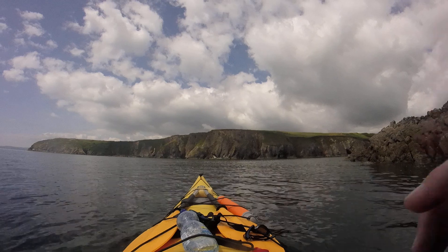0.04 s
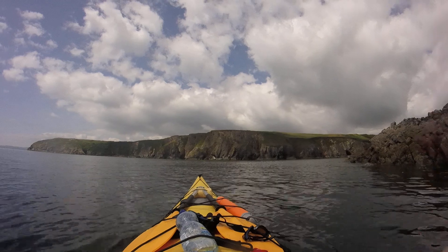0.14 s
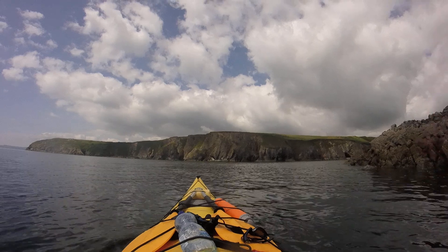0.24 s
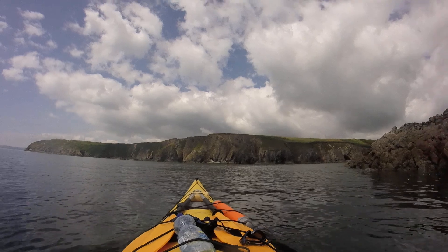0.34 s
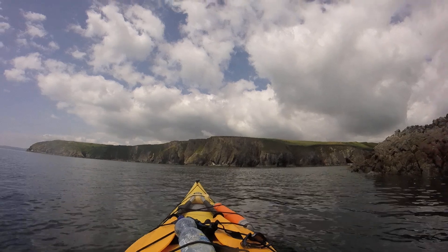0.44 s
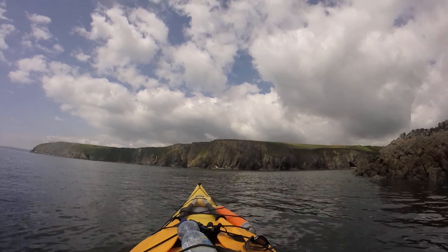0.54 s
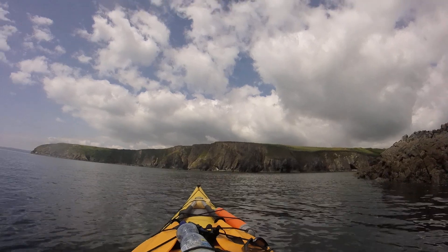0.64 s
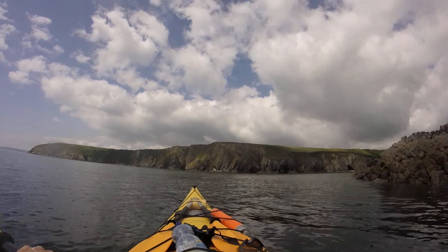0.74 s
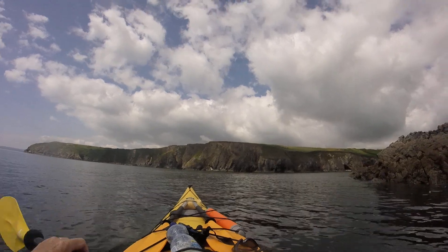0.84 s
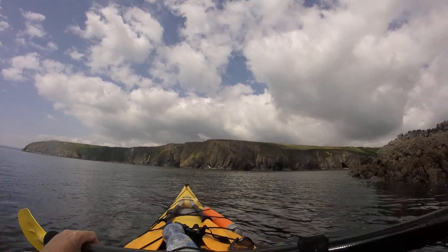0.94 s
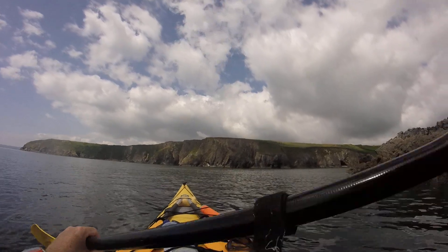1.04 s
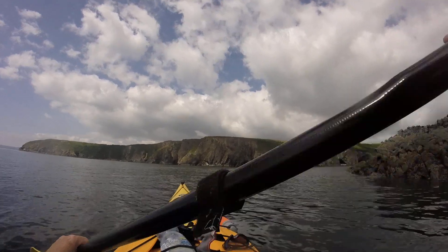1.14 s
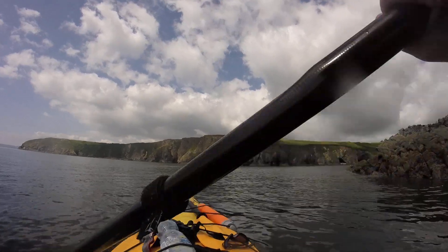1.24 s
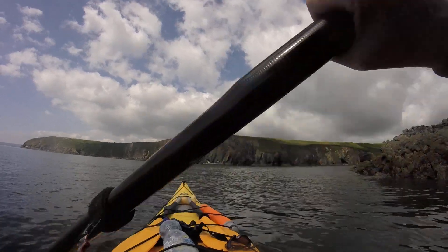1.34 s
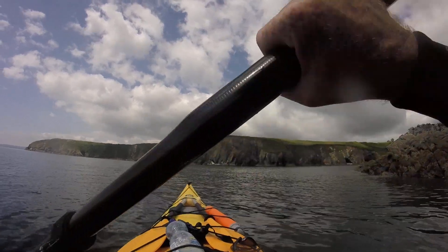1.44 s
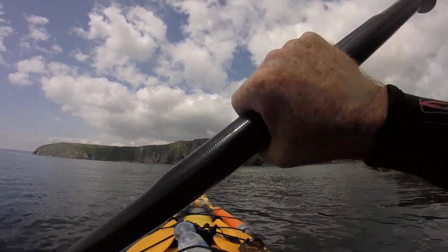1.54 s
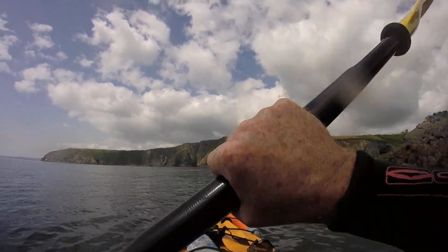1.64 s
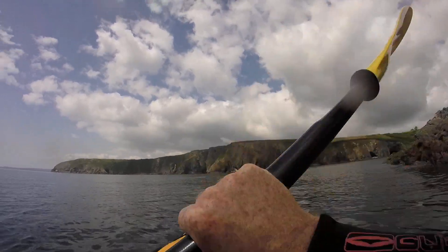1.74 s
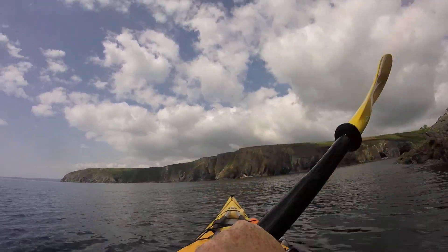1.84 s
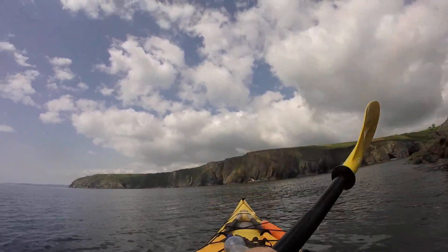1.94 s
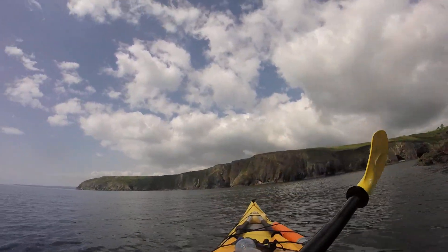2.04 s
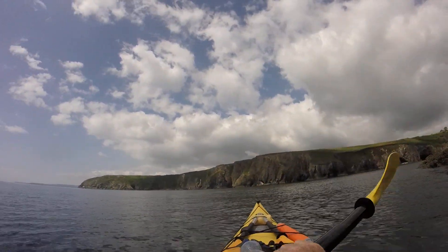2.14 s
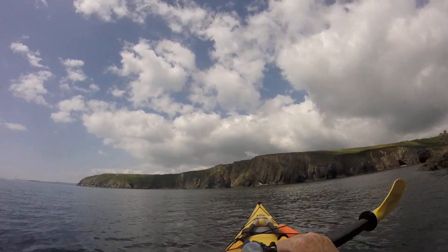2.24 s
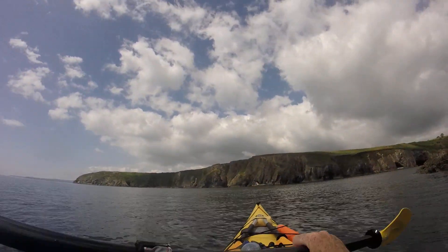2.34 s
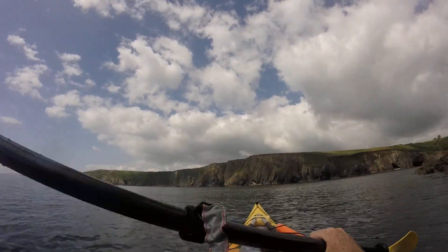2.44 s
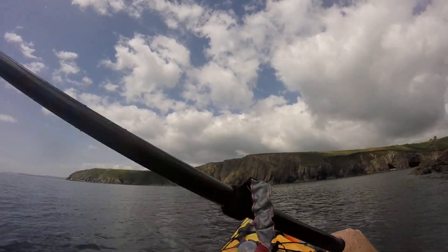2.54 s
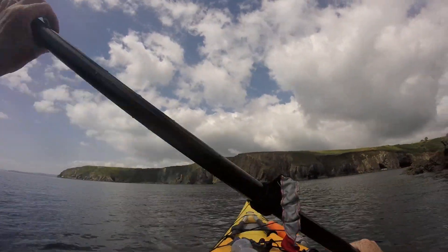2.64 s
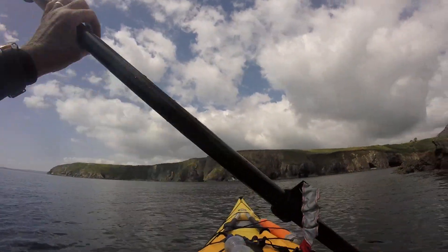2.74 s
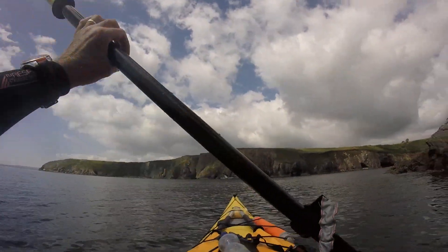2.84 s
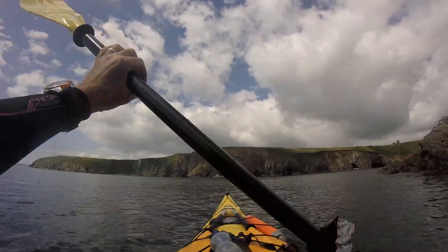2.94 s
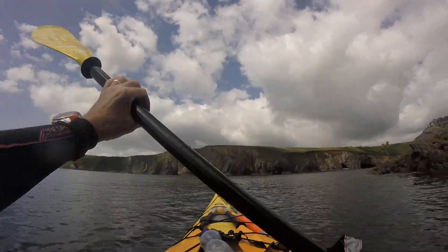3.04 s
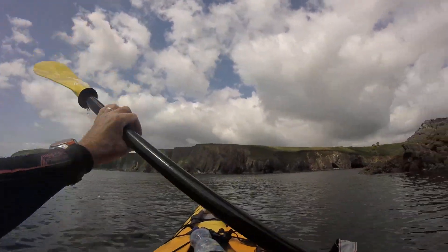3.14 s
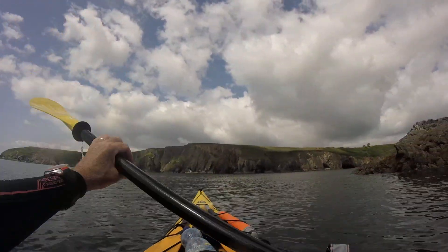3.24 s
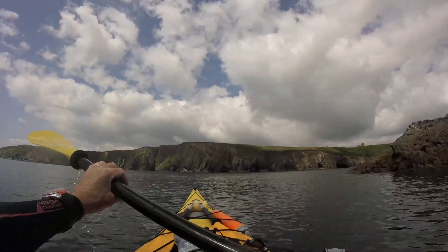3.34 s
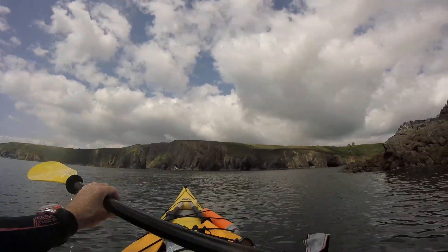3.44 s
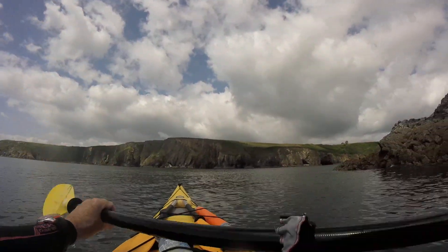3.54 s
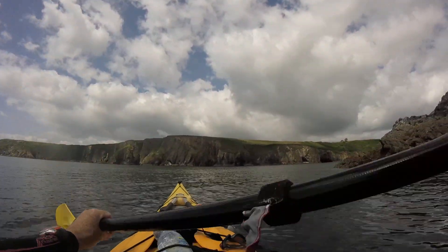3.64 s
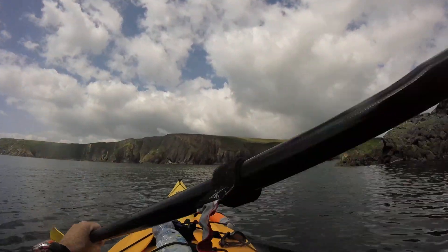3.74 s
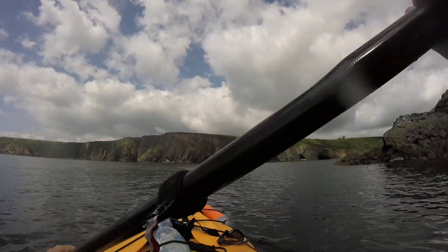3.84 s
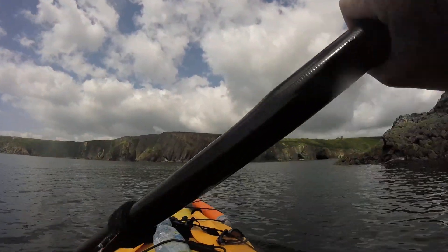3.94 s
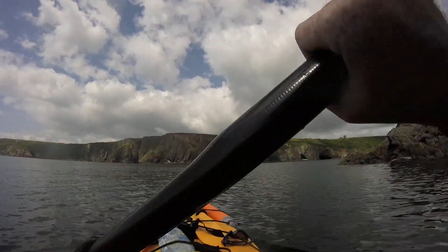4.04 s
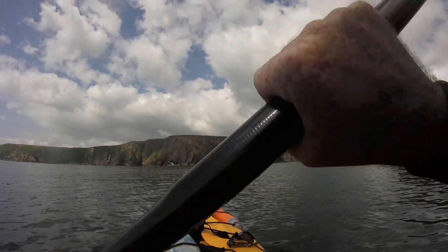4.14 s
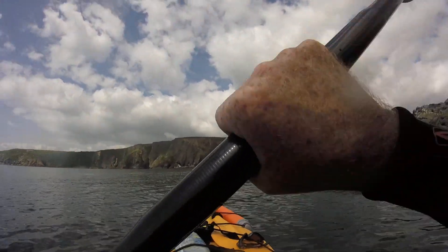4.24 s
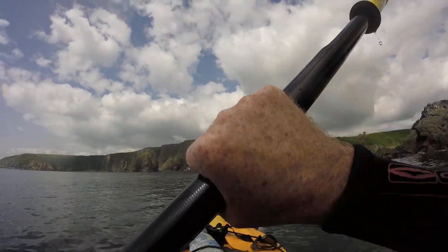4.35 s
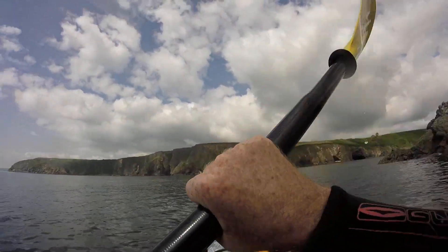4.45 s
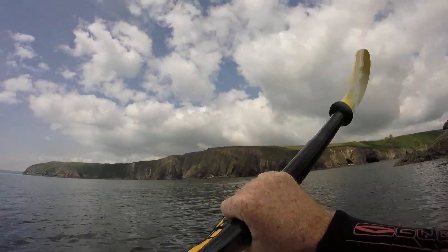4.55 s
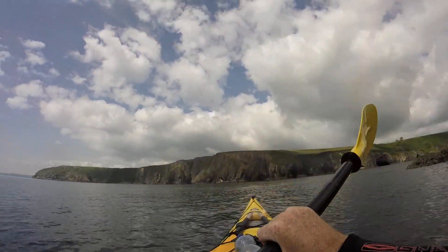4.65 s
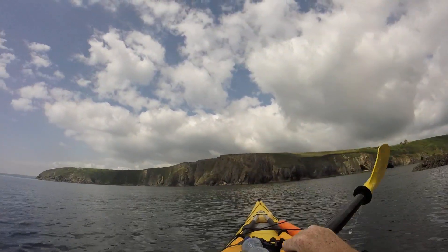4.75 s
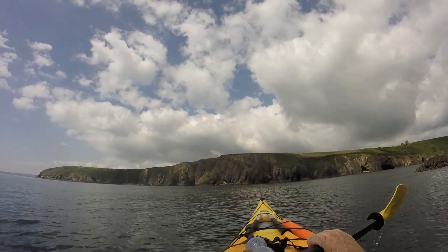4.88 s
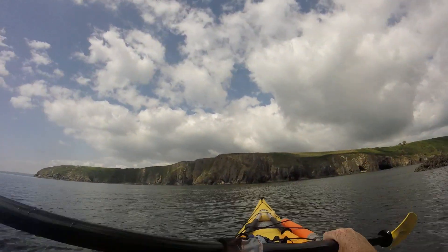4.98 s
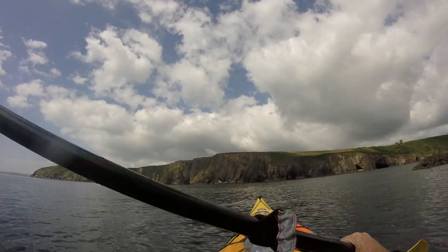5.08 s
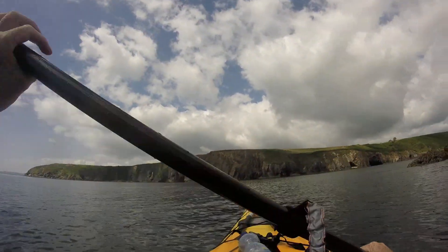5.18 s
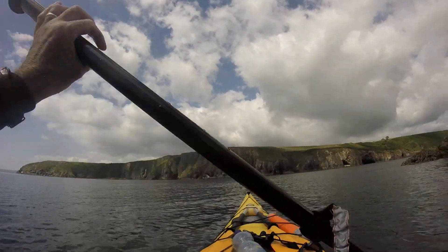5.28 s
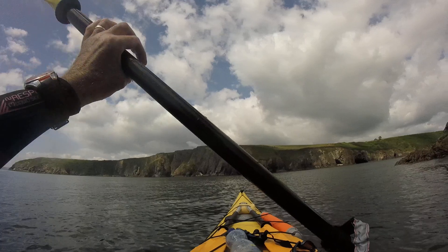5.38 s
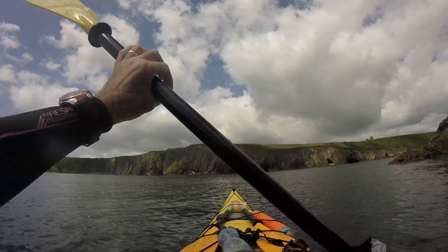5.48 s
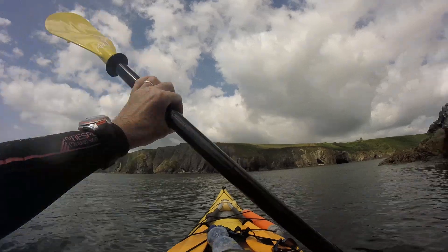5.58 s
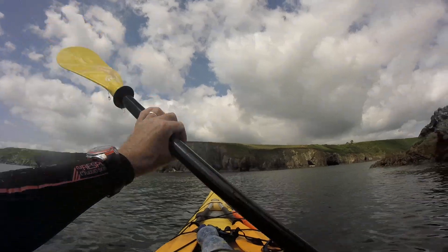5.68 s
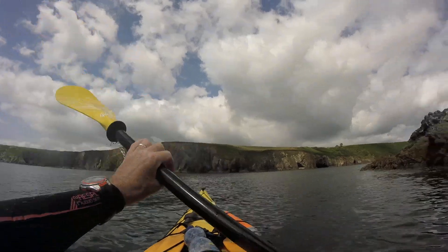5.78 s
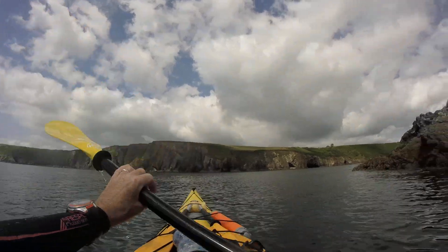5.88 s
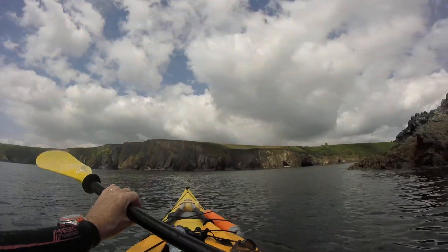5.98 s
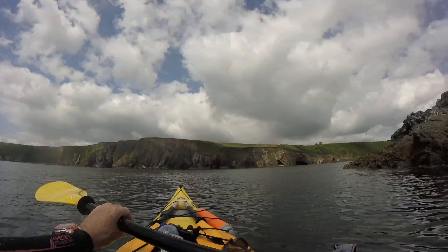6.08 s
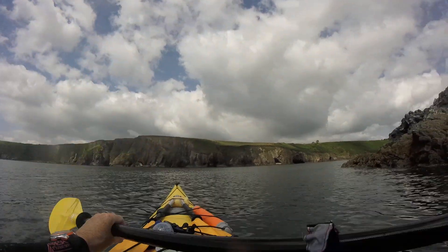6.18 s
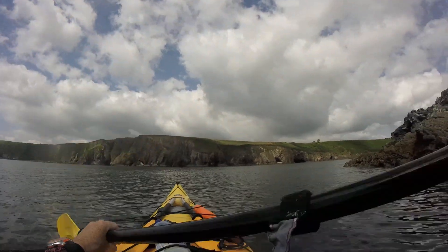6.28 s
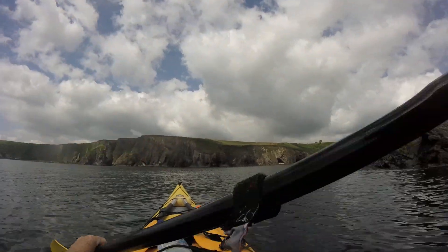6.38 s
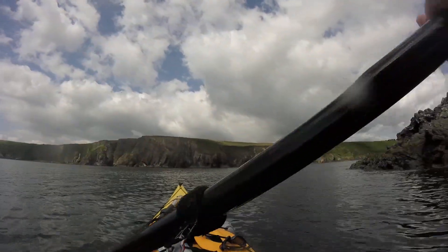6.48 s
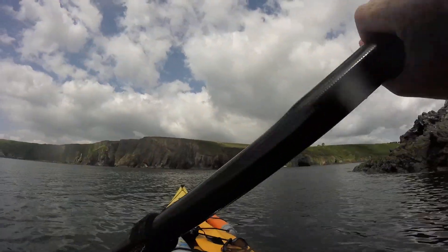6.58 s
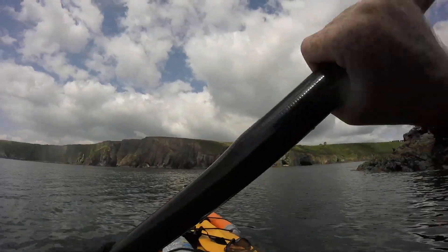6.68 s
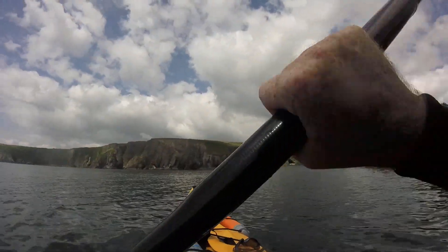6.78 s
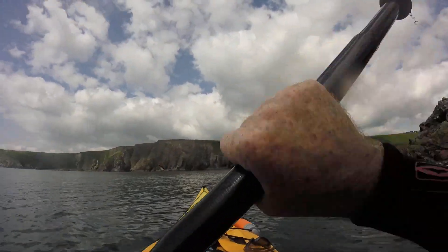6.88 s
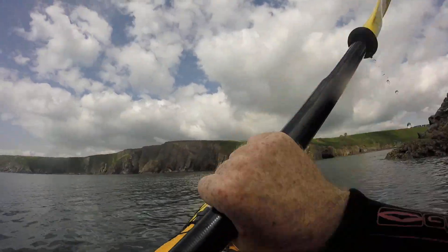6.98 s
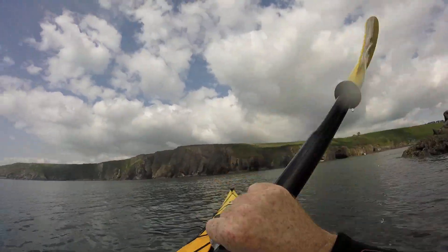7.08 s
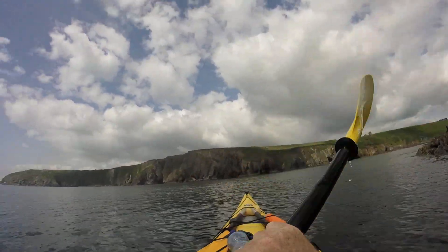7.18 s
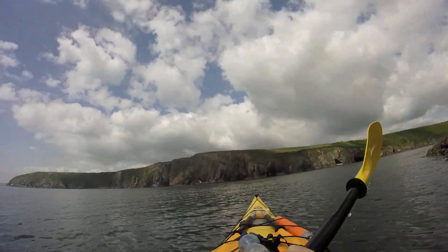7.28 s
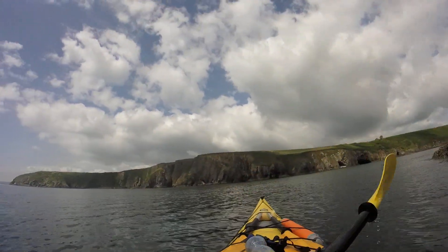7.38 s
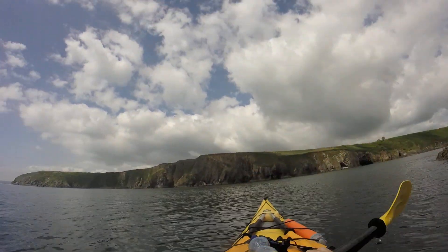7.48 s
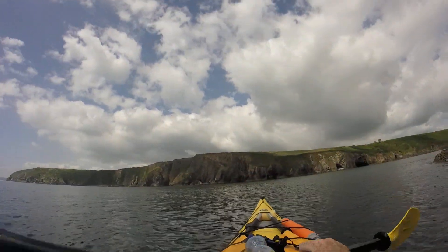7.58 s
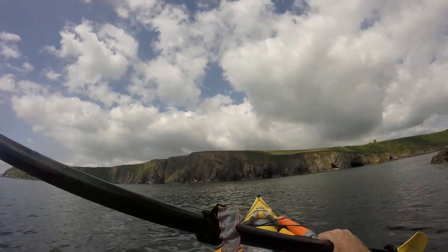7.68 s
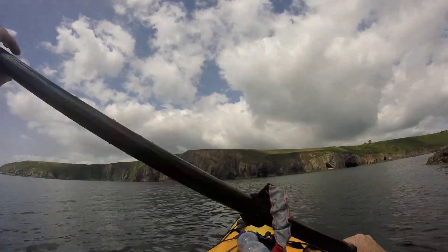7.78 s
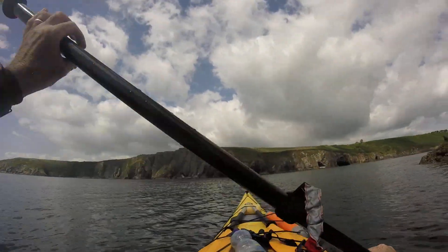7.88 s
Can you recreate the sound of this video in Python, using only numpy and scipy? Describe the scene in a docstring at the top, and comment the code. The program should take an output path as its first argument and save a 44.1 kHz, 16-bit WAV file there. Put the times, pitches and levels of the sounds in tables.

```python
"""Sea kayak paddle, five alternating strokes, heard from a camera in a waterproof case.
Each pull tears the surface into small bubbles (splash) and drags air pockets under (gurgle).
Drops off the raised blade tap the case and deck or plink in the sea; fine spray ticks.
Light wind rumbles and ripples wash around the hull. The hollow case adds its resonances."""
import sys
import numpy as np
from scipy import signal
from scipy.fft import rfft, irfft, next_fast_len
from scipy.io import wavfile
from scipy.ndimage import map_coordinates

SR = 44100
rng = np.random.default_rng(int(sys.argv[2]) if len(sys.argv) > 2 else 0)


def materialize(psi):
    """Save the field psi as 16-bit PCM at rate SR to the path in sys.argv[1].

    A 1-D psi becomes a single channel; in a 2-D psi each row is a channel.
    """
    bounded = np.clip(np.atleast_2d(psi).T, -1, 1)
    quanta = np.round(bounded * 32767).astype(np.int16)
    wavfile.write(sys.argv[1], SR, quanta)


N = 349272
T = np.arange(N) / SR

# case resonances: f/Hz, width/Hz, lift/dB
CASE_MODES = [(846, 56, 7), (1183, 283, 12), (1402, 167, 11), (2010, 66, 4), (2265, 64, 5.5),
              (2724, 233, 12), (3084, 200, 4.5), (3833, 130, 8), (4350, 120, 0.5), (5340, 300, 11.5),
              (7150, 240, 6.5), (9000, 340, 5.5)]
# breeze with lulls: t/s, level/dB
BREEZE_LEVELS = [(0.05, -67.5), (0.6, -57.5), (0.8, -49), (1.5, -47.5), (2.5, -49), (2.85, -45.5),
                 (3.7, -47), (4.85, -51), (5.1, -56), (5.4, -45.5), (6.55, -49.5), (7.92, -48)]
# soft thumps of air on the case: t/s, level/dB
AIR_THUMPS = [(1.43, -42.5), (4.01, -39.5), (4.95, -46), (6.39, -42.5)]
# spray near the microphone: t/s, relative level/dB
SPRAY_TICKS = [(1.244, -55), (1.2633, -48), (3.954, -49.5), (4.257, -49), (4.273, -52), (5.1126, -50),
               (5.2138, -47), (6.045, -48), (6.515, -49), (6.524, -40.5), (6.905, -45.5), (7.829, -47)]
# bubbles trapped by drips: t/s, level/dB, f/Hz
DRIP_BUBBLES = [(1.259, -32, 1470), (1.576, -49, 3130), (1.6578, -37.5, 1680), (3.628, -36.5, 1500),
                (4.168, -44, 1500), (5.217, -38, 1303), (5.236, -41, 2700), (7.8796, -40.5, 2690)]
# drops on case and deck: t/s, level over 5 ms/dB, ring f/Hz, ring lift/dB, splatter/s, treble/dB
DROP_HITS = [(0.8048, -34.5, 1370, 0.5, 0.0021, -15), (0.8234, -31, 2410, 10, 0.017, -12),
             (0.828, -33, 2430, 11, .011, -5), (0.893, -48, 2760, 14, .006, -17),
             (1.256, -34, 1600, 20, .0022, -5), (1.7611, -24.5, 2370, 7, 0.00063, -20.5),
             (2.116, -31, 2240, 5, 0.013, -18), (2.679, -40, 1400, -3, .012, -9),
             (3.161, -21.5, 1900, 8.5, 0.0023, -1.5), (3.261, -33, 2830, 7, 0.016, -9),
             (4.2685, -37.5, 1640, 10, 0.015, -18), (4.607, -28, 1390, 5, 0.011, -13),
             (4.6434, -39, 1370, -1, 0.0071, -10), (5.146, -49.5, 1580, 11, 0.0045, -16),
             (5.644, -31.5, 2700, 9, 0.011, -7), (6.512, -42.5, 1420, 11, 0.033, -4),
             (6.89, -39.5, 2130, 12, .014, -9), (7.1806, -25.5, 1350, 7, 0.0088, -19),
             (7.8285, -36.5, 2850, 22, 0.0053, -6)]
# water folding by the blade or slapping the hull: t/s, half length/s, splash/dB, gurgle/dB
WATER_SURGES = [(0.75, .04, -58.5, -59), (1.117, 0.086, -53.5, -54), (1.444, 0.061, -57, -56),
                (1.7, 0.071, -54, -46), (2.003, 0.016, -42.5, -41), (2.111, 0.023, -40.5, -35.5),
                (2.235, 0.041, -43, -40.5), (2.772, 0.032, -49.5, -47), (2.966, .03, -68, -40.5),
                (3.253, 0.025, -41.5, -35.5), (3.481, 0.074, -44.5, -39.5), (3.68, 0.096, -53.5, -60),
                (5.652, 0.034, -41, -40), (5.777, .015, -41.5, -43), (5.872, 0.019, -38.5, -33),
                (5.997, 0.011, -44, -46), (6.086, .008, -45.5, -50), (6.185, 0.057, -47, -43),
                (6.645, 0.032, -50, -45.5), (6.897, 0.024, -50, -41.5), (7.404, 0.0037, -35.5, -46),
                (7.447, .008, -34.5, -33), (7.495, 0.041, -40.5, -42), (7.668, 0.029, -46.5, -60)]
# blade pulls: full force t/s, hold/s, splash/dB, gurgle/dB, 20 dB rise/s, 20 dB fall/s
BLADE_PULLS = [(1.92, 0.083, -40.5, -35.5, 0.21, 0.22), (3.12, 0.15, -45, -42.5, 0.41, 0.18),
               (4.548, 0.16, -37.5, -35.5, 0.27, 0.23), (5.68, 0.3, -44, -41, 0.49, 0.46),
               (7.14, .13, -38, -36, 0.18, 0.49)]
# source spectra: f/Hz, relative level/dB
WIND_SPECTRUM = [(10, -29), (25, 0), (60, -1), (105, 1), (150, -3), (250, -14.5), (600, -39), (2000, -96)]
RIPPLE_SPECTRUM = [(100, -23), (400, 4), (800, -0.5), (1400, -3), (2700, -5), (4000, -13), (6000, -15.5),
                   (7500, -19.5), (9200, -21), (12000, -28.5), (15000, -32)]
TICK_SPECTRUM = [(300, -20), (1500, -0.5), (3500, -1), (5200, -6.5), (6200, 3.5), (7500, -13), (9000, -9),
                 (15000, -27)]
TAP_SPECTRUM = [(40, -11), (180, 8), (380, 4), (600, -10.5), (1100, -9.5), (1900, -2.5), (2600, -11.5),
                (3800, -5.5), (5300, -18), (7000, -26), (9500, -32), (15000, -51)]
GURGLE_SPECTRUM = [(40, -35.5), (110, -7.5), (150, -11), (190, -1), (250, -0.5), (320, -4), (375, -3.5),
                   (460, -14.5), (650, -27.5), (1500, -65.5)]
SPLASH_SPECTRUM = [(150, -33), (400, 6), (700, -5.5), (1100, -5), (1700, -2), (2500, 0), (3400, -7.5),
                   (4600, -14), (7000, -20.5), (10000, -26.5), (15000, -54)]


def amp(db):
    return 10 ** (np.asarray(db) / 20)


def unit_rms(x):
    return x / np.sqrt(np.mean(x ** 2) + 1e-20)


def power_sum(*gains):
    return np.sqrt(sum(gain ** 2 for gain in gains))


def hump(at_s, half_s):
    return np.exp(-((T - at_s) / half_s) ** 2 / 2)


def bell(hz, centre_hz, width_hz):
    return 1 / (1 + (2 * (hz - centre_hz) / width_hz) ** 2)


def wobble(rate_hz):
    """Smooth random curve, rms near 1."""
    knots = rng.standard_normal(int(N * rate_hz / SR) + 4)
    return map_coordinates(knots, [T * rate_hz])


def spectrum_db(points, hz):
    """Interpolation on a log frequency axis."""
    knots_hz, knots_db = np.transpose(points)
    return np.interp(np.log(hz + 1), np.log(knots_hz + 1), knots_db)


def coloured(x, gain_db):
    """Minimum-phase filter: resonances ring after each blow."""
    size = 2 * next_fast_len(len(x) // 2 + 2048)
    hz = np.fft.rfftfreq(size, 1 / SR)
    cepstrum = irfft(np.log(amp(gain_db(hz)) + 1e-6), size)
    cepstrum[1:size // 2] *= 2
    cepstrum[size // 2 + 1:] = 0
    return irfft(rfft(x, size) * np.exp(rfft(cepstrum)), size)[:len(x)]


def case_db(hz):
    """Summed lift of the case resonances."""
    return sum(db * bell(hz, centre_hz, width_hz) for centre_hz, width_hz, db in CASE_MODES)


def case_ring(t):
    """Impulse response of the case: neighbouring modes start opposed, so the ring builds briefly."""
    ring = 1.0 * (t == 0)
    for k, (hz, width_hz, db) in enumerate(CASE_MODES):
        gain = (-1) ** k * amp(db) * 2 * np.pi * width_hz / SR
        ring += gain * np.exp(-np.pi * width_hz * t) * np.cos(2 * np.pi * hz * t)
    return ring


def bubbles(count, centre_hz, log_spread, cycles, scatter_db, rise):
    """Cloud of bubbles at rms 1; each rises in pitch and decays 40 dB over `cycles`."""
    when, size = rng.random((2, count))
    hz = centre_hz * np.exp(log_spread * rng.standard_normal((count, 1)))
    hz = np.clip(hz, centre_hz / 3, SR / 4)
    t = np.arange(int(2 * cycles / centre_hz * SR)) / SR
    age = t * hz / cycles
    strength = amp(-scatter_db * np.log(1 - .98 * size))[:, None]
    phase = 2 * np.pi * hz * t * (1 + rise * np.minimum(age, 1))
    rings = strength * amp(-40 * age) * np.sin(phase)
    index = (when * N).astype(int)[:, None] + np.arange(len(t))
    return unit_rms(np.bincount(index.ravel(), rings.ravel(), N)[:N])


def breeze_gain():
    return amp(np.interp(T, *np.transpose(BREEZE_LEVELS)))


def sea_fade_in_db():
    return np.interp(T, [.03, .06, .45, .85], [-53, -17, -12, 0])


def pull(at_s, hold_s, rise_s, fall_s):
    """Gain of one stroke: rise, hold, fall."""
    away = np.maximum(at_s - T, 0) / rise_s + np.maximum(T - at_s - hold_s, 0) / fall_s
    return amp(-20 * away)


def drag(stretch):
    """Gain of the water dragged by all strokes, rise and fall times stretched."""
    return power_sum(*[amp(db) * pull(at_s, hold_s, stretch * rise_s, stretch * fall_s)
                       for at_s, hold_s, _, db, rise_s, fall_s in BLADE_PULLS])


def wind():
    """Light air buffets the case, harder as the boat lunges with each pull."""
    lunges = amp(-5) * drag(stretch=2.25)
    thumps = [amp(db) * hump(at_s, half_s=.016) for at_s, db in AIR_THUMPS]
    buffet = power_sum(breeze_gain(), lunges, *thumps)
    rumble = coloured(rng.standard_normal(N), lambda hz: spectrum_db(WIND_SPECTRUM, hz))
    return unit_rms(rumble) * buffet * amp(1.6 * wobble(rate_hz=8.9))


def ripples():
    """Steady wash of open water."""
    noise = rng.standard_normal(N)
    wash = coloured(noise, lambda hz: spectrum_db(RIPPLE_SPECTRUM, hz) + .16 * case_db(hz))
    return unit_rms(wash) * amp(-56 + sea_fade_in_db() + wobble(rate_hz=7.6))


def trickle():
    """Faint bubbles ring all around."""
    cloud = bubbles(count=2200, centre_hz=2000, log_spread=.35, cycles=10, scatter_db=2.6, rise=.08)
    return unit_rms(coloured(cloud, case_db)) * amp(-59 + sea_fade_in_db())


def spray():
    """Tiny droplets burst in a few milliseconds of bright fizz."""
    out, t = np.zeros(N + SR), np.arange(SR // 20) / SR
    for at_s, db in SPRAY_TICKS:
        burst = rng.standard_normal(len(t)) * t * np.exp(-t / .0009)
        tick = coloured(burst, lambda hz: spectrum_db(TICK_SPECTRUM, hz) + .5 * case_db(hz))
        out[round(at_s * SR):][:len(t)] += amp(db + 7.5) * tick / np.abs(tick).max()
    return out[:N]


def plinks():
    """Drips off the blade each trap a bubble that rings, rising in pitch."""
    out, t = np.zeros(N + SR), np.arange(SR // 20) / SR
    attack_s, t60_s = .0006, .041
    envelope = (1 - np.exp(-t / attack_s)) * amp(-60 * t / t60_s)
    for at_s, db, hz in DRIP_BUBBLES:
        chirp = np.sin(2 * np.pi * hz * t * (1 + 1.9 * t))
        out[round(at_s * SR):][:len(t)] += amp(db) * envelope * chirp
    return out[:N]


def drops():
    """Each drop: a sharp tap and brief splatter, rung by the case and the spot it hits."""
    out, t = np.zeros(N + SR), np.arange(SR // 10) / SR
    ring = case_ring(t)
    treble_hz, level_window_s = 3200.0, .005
    for at_s, db, ring_hz, ring_db, splatter_s, treble_db in DROP_HITS:
        def tap_db(hz):
            spot_db = ring_db * bell(hz, ring_hz, .3 * ring_hz)
            contact_db = treble_db * hz ** 10 / (hz ** 10 + treble_hz ** 10)  # soft landings are dull
            hollow_db = .21 * case_db(hz)  # a direct blow rings the case harder
            return spectrum_db(TAP_SPECTRUM, hz) + spot_db + contact_db + hollow_db

        blow = 18 * splatter_s * rng.standard_normal(len(t)) * amp(-35 * t / splatter_s)
        blow[0] = 1  # impact ahead of the splatter
        tap = coloured(signal.fftconvolve(blow, ring)[:len(t)], tap_db)
        rms = np.sqrt(np.sum(tap ** 2) / (level_window_s * SR))
        out[round(at_s * SR):][:len(t)] += amp(db) * tap / rms
    return out[:N]


def splash():
    """Blade and surges tear the surface into small bubbles."""
    pulls = [amp(db) * pull(at_s, hold_s, rise_s, fall_s)
             for at_s, hold_s, db, _, rise_s, fall_s in BLADE_PULLS]
    surges = [amp(db) * hump(at_s, half_s) for at_s, half_s, db, _ in WATER_SURGES]
    froth = bubbles(count=18000, centre_hz=1800, log_spread=.5, cycles=6, scatter_db=3, rise=.1)
    froth += 1.09 * rng.standard_normal(N)
    froth = coloured(froth, lambda hz: spectrum_db(SPLASH_SPECTRUM, hz) + case_db(hz))
    return unit_rms(froth) * power_sum(*pulls, *surges)


def gurgle():
    """Big air pockets, dragged under, start sooner and last longer than the splash."""
    hull_lapping = amp(-7.5) * breeze_gain()
    surges = [amp(db) * hump(at_s, half_s) for at_s, half_s, _, db in WATER_SURGES]
    pockets = bubbles(count=1500, centre_hz=252, log_spread=.425, cycles=9.5, scatter_db=1.5, rise=.22)
    pockets += 4 * rng.standard_normal(N)
    pockets = coloured(pockets, lambda hz: spectrum_db(GURGLE_SPECTRUM, hz))
    return unit_rms(pockets) * power_sum(drag(stretch=1.09), hull_lapping, *surges)


def paddle():
    """Splash and gurgle fluctuate together as the water folds over."""
    slosh = wobble(rate_hz=55)
    return splash() * amp(1.06 * slosh - 1) + gurgle() * amp(.7 * slosh - 1.77)


def scene():
    """Mono mix of paddle, drips, water and wind."""
    return (paddle() + drops() + plinks() + trickle() + spray() + ripples() + wind())[None]


def record(dry):
    """Camera band limit: brick-wall low-pass."""
    size, top_hz = next_fast_len(N + SR // 2), 15350
    passband = np.fft.rfftfreq(size, 1 / SR) < top_hz
    return irfft(rfft(dry, size) * passband, size)[:, :N]


dry = scene()
out = record(dry)
materialize(out)
```